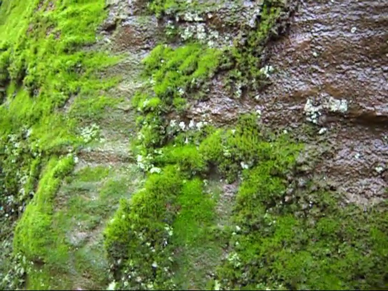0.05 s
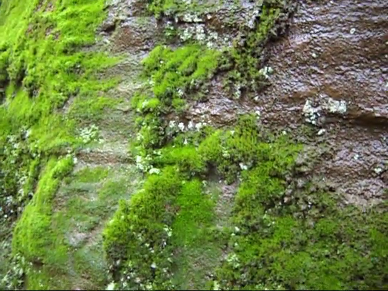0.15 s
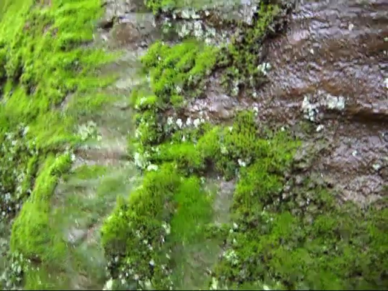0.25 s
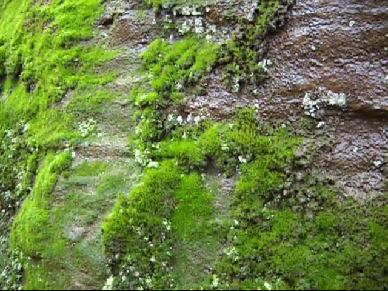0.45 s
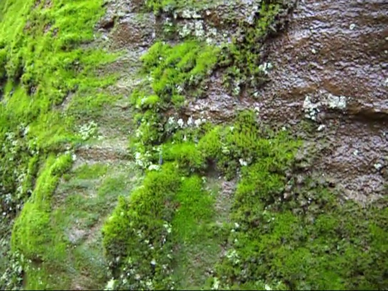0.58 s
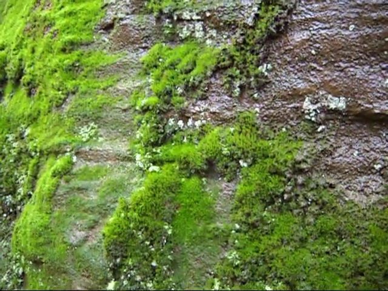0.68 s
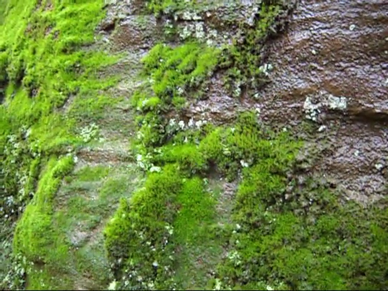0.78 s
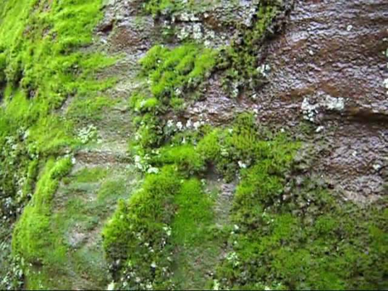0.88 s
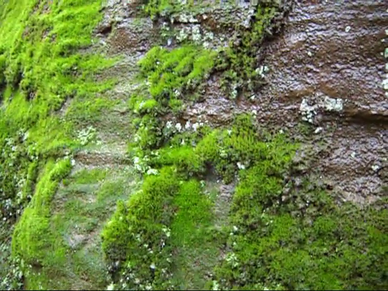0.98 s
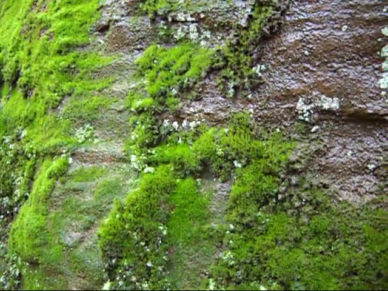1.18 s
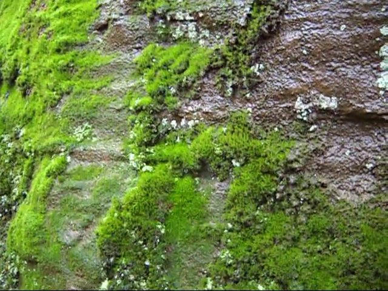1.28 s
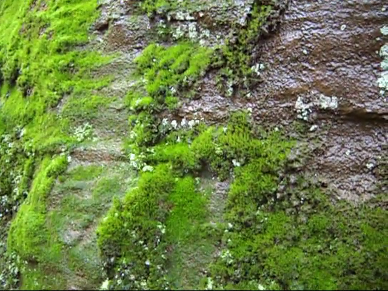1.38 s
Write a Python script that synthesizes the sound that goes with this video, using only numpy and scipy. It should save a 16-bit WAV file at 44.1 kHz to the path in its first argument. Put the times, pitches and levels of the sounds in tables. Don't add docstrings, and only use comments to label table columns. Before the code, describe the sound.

Water drops tick sharply on wet mossy rock, then a dull low knock over faint hiss

```python
import sys
import numpy as np
from scipy import signal
from scipy.fft import rfft, irfft
from scipy.io import wavfile
from scipy.ndimage import uniform_filter1d

SR = 44100
rng = np.random.default_rng(int(sys.argv[2]) if len(sys.argv) > 2 else 0)


def int16_out(signal):
    q = np.round(np.clip(np.atleast_2d(signal).T, -1, 1) * 32767)
    wavfile.write(sys.argv[1], SR, q.astype(np.int16))


def magnitude_from_level(level_db):
    exponent = np.asarray(level_db, float) / 20
    return 10 ** exponent


N = 63945
T = np.arange(N) / SR


def level(x, db):
    return x * magnitude_from_level(db) / np.sqrt(np.mean(x ** 2))


def band(x, hz, width_hz):
    return signal.lfilter(*signal.iirpeak(hz, hz / width_hz, fs=SR), x)


def walk(rate):
    hold = int(SR / rate)
    steps = np.repeat(rng.standard_normal(N // hold + 1), hold)
    smooth = uniform_filter1d(uniform_filter1d(steps, hold), hold)[:N]
    return (smooth - smooth.mean()) / smooth.std()


def ring(start, hz, db, rise, t60):
    t = np.maximum(T - start, 0)
    push = 1 - np.exp(-(t / rise) ** 2)
    return magnitude_from_level(db - 60 * t / t60) * push * np.sin(2 * np.pi * hz * t)


def drops():
    # [f/Hz, level/dB, t60/s]
    hollow_moss = [(556.4, -16, 0.12), (830, 4.5, .016), (1175, -16, .02), (1867, -5.5, 0.021),
                   (2294, 4, 0.0072)]
    bare_stone = [(549, -13.5, 0.1), (660, -7.5, 0.03), (895, -24, 0.13), (1115, -29, 0.34),
                  (1430, 6.5, .011), (2236, 0.5, 0.015), (2360, -2.5, 0.011), (3560, -12, .012)]
    water_film = [(870, -5, 0.011), (1415, 1.5, 0.013), (2170, -16, 0.018), (2670, -19.5, 0.022)]
    # [t/s, peak level/dB]
    moss_drops = [
        (0.2155, -30),
        (0.2738, -42),
        (0.3968, -33),
    ]
    stone_drops = [
        (0.2304, -50),
        (.2362, -21.5),
        (0.2435, -53),
        (0.2617, -48.5),
    ]
    film_drops = [
        (0.4549, -32.5),
    ]
    contact_s = (0.00047, 0.00043, 0.00057)

    surfaces = zip((moss_drops, stone_drops, film_drops), (hollow_moss, bare_stone, water_film), contact_s)
    sound = np.zeros(N)
    for hits, tones, rise in surfaces:
        for start, drop_db in hits:
            for hz, tone_db, t60 in tones:
                sound += ring(start, hz, drop_db + tone_db, rise, t60)
    return sound


def spray():
    spray_s = [.217, .238, .24, .398, .457, .58, .82]
    # [level/dB, t60/s]
    bursts = [(-47.5, 0.11), (-42, 0.068), (-54.5, 1), (-51.5, 0.075), (-66, 0.21), (-78.5, 0.31),
              (-71, 0.54)]
    per_second, scatter_db = 9000, 1.5

    lands = rng.random(N) < per_second / SR
    sizes = magnitude_from_level(scatter_db * rng.exponential(size=N))
    droplets = lands * rng.standard_normal(N) * sizes
    fade = np.zeros(N)
    for start, (db, t60) in zip(spray_s, bursts):
        since = np.maximum(T - start, 0)
        fade += (T > start) * magnitude_from_level(db - 60 * since / t60)
    return level(band(droplets, 1300, 2000), 0) * fade


def shakes():
    shake_s = [.21, .236, .39, 1.12, 1.128, 1.13, 1.136, 1.154, 1.17]
    # [f/Hz, peak level/dB, rise/s, t60/s]
    body_tones = [
        (111.4, -44, 0.016, 0.54),
        (192, -50, .01, .09),
        (109.3, -53, 0.017, 0.23),
        (57.7, -31.5, 0.028, 0.23),
        (164.7, -24, 0.018, 0.071),
        (684, -52.5, 0.0053, 0.053),
        (312, -43, 0.0053, 0.056),
        (52.7, -30.5, 0.031, 0.16),
        (314, -53, 0.0045, 0.049),
    ]
    return sum(ring(start, *tone) for start, tone in zip(shake_s, body_tones))


def rub():
    # [f/Hz, width/Hz, level/dB]
    rub_tone = (2260, 450, -64)
    middle_s, length_s = 1.142, 0.012
    hz, width_hz, db = rub_tone
    friction = level(band(rng.standard_normal(N), hz, width_hz), db)
    return friction * np.exp(-((T - middle_s) / length_s) ** 2)


def breeze():
    # [t/s, level/dB]
    gusts = [(0, -61), (0.101, -66), (.18, -56), (.3, -57), (.42, -62.5), (.47, -58.5), (.53, -61),
             (.58, -57), (.64, -63), (.7, -59.5), (.74, -62.5), (.8, -54.5), (.9, -62.5), (1.001, -64.5),
             (1.1, -61), (1.25, -61), (1.32, -62.5), (1.45, -69)]
    gust_s, gust_db = np.array(gusts).T
    low = band(rng.standard_normal(N), 47, 36)
    low = signal.sosfilt(signal.butter(6, 87, fs=SR, output="sos"), low)
    steady = low / np.sqrt(uniform_filter1d(low ** 2, size=SR // 10) + 1e-12)
    flicker_db = 1.2 * walk(16.26)
    return level(steady * magnitude_from_level(flicker_db), 0) * magnitude_from_level(np.interp(T, gust_s, gust_db))


def air():
    # [f/Hz, level per Hz/dB]
    hiss_colour = [(60, 3), (110, -1), (220, -2.5), (480, -9.5), (1400, -10.5), (2700, -16.5),
                   (3500, -19.5), (3990, -23.5)]
    hz, db = np.array(hiss_colour).T
    f = np.arange(N // 2 + 1) * SR / N + 1
    colour_db = np.interp(np.log(f), np.log(hz), db, -80, -80)
    hiss = irfft(rfft(rng.standard_normal(N)) * magnitude_from_level(colour_db), N)
    swell_db = 0.5 * walk(5.96)
    return level(hiss, -66.5) * magnitude_from_level(swell_db)


def scene():
    body_low_hz, input_top_hz, leak_db = 410, 2746, -17.5
    small_body = signal.butter(3, body_low_hz, "high", fs=SR, output="sos")
    wet = signal.sosfilt(small_body, drops() + spray())
    near = wet + shakes() + rub() + breeze()
    input_filter = signal.butter(10, input_top_hz, fs=SR, output="sos")
    dull = signal.sosfiltfilt(input_filter, near)
    leak = magnitude_from_level(leak_db) * (near - dull)
    return (dull + leak + air())[None]


def band_limit(x):
    return signal.sosfilt(signal.butter(12, 11690, fs=SR, output="sos"), x)


def record(dry):
    rounding_db, circuit_db, treble_db = -27.5, -73, 2
    hold_hz, notch_width_hz, top_hz = 8000, 340, 10860
    x = signal.resample_poly(dry[0], 80, 441)
    x = x + magnitude_from_level(rounding_db) * np.abs(x) * rng.standard_normal(len(x))
    held = np.repeat(x, 21)[10:]
    x = signal.resample_poly(held, 21, 80)
    x = np.pad(x, (0, N))[:N] + magnitude_from_level(circuit_db) * rng.standard_normal(N)
    notch = band(x, hold_hz, notch_width_hz)
    lift = (magnitude_from_level(treble_db) - 1) * band(x, 14000, 2500)
    x = x - notch + lift
    x = signal.sosfilt(signal.ellip(10, 0.2, 40, top_hz, fs=SR, output="sos"), x)
    mix = x[None]
    return band_limit(mix)


dry = scene()
out = record(dry)
int16_out(out)
```